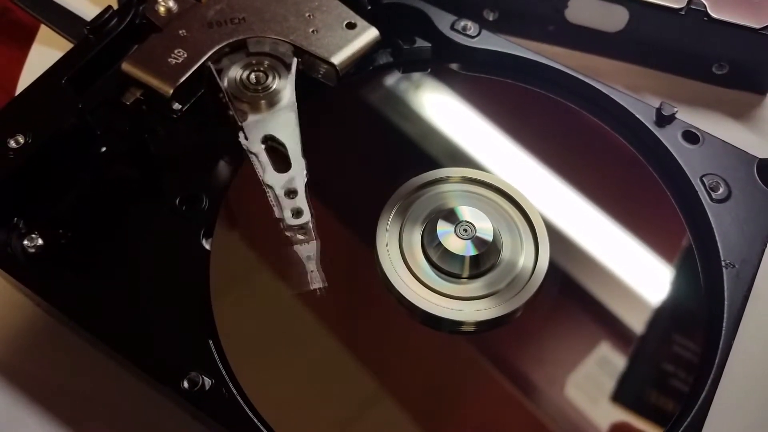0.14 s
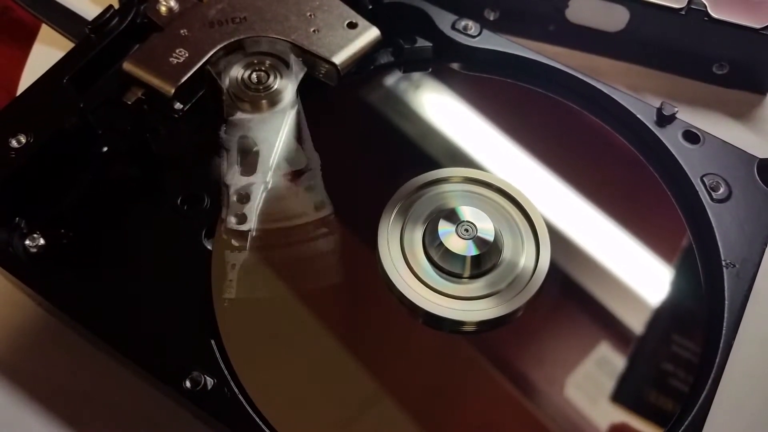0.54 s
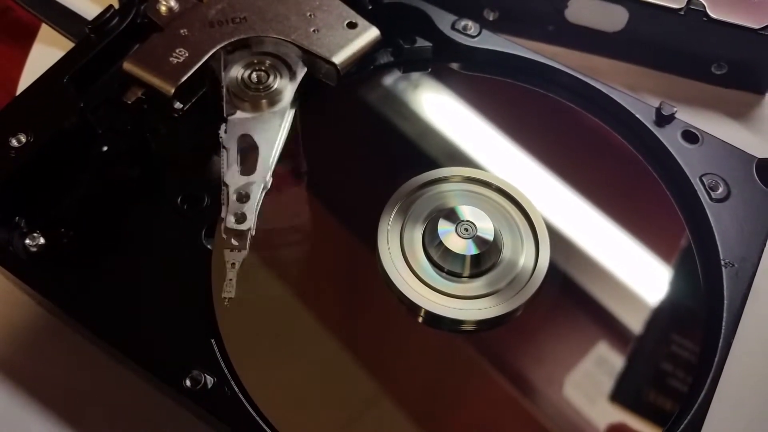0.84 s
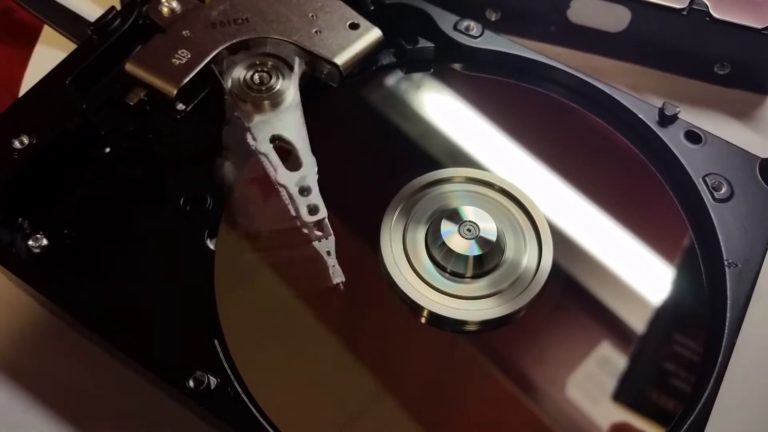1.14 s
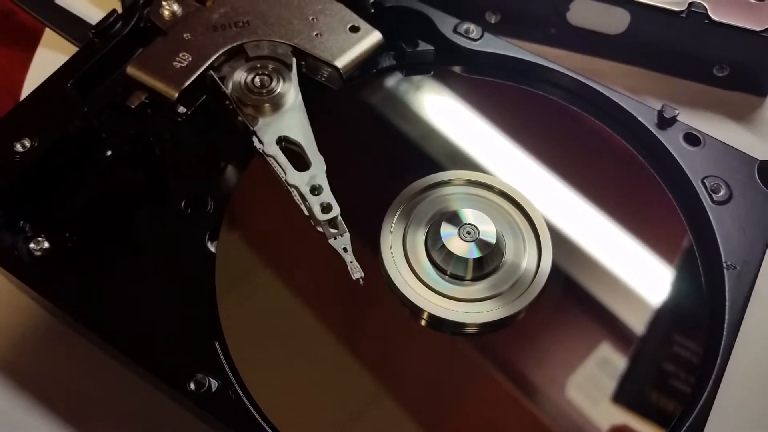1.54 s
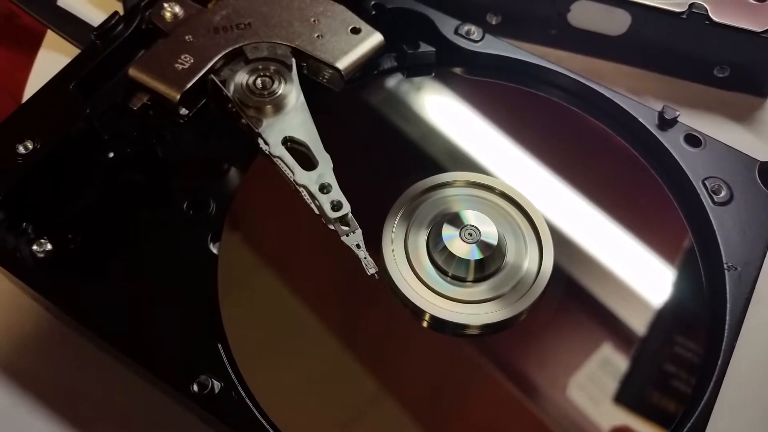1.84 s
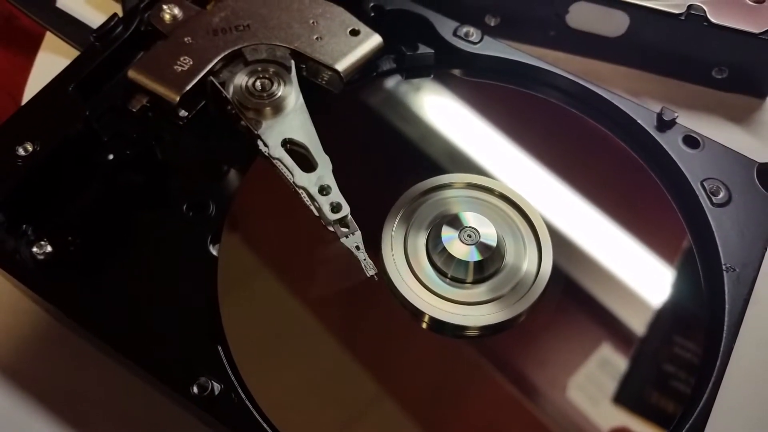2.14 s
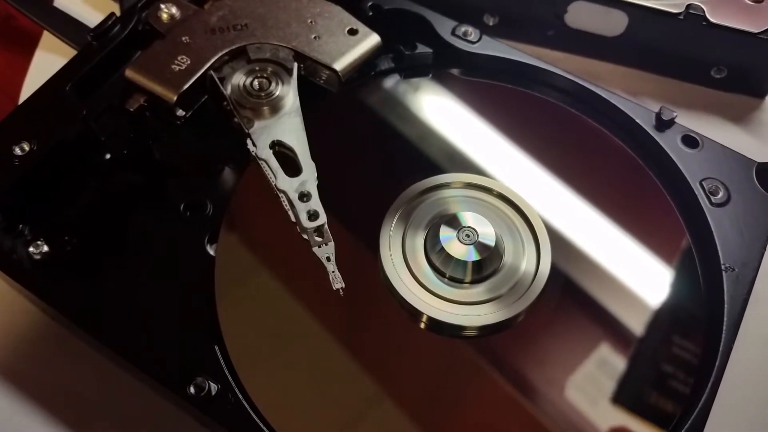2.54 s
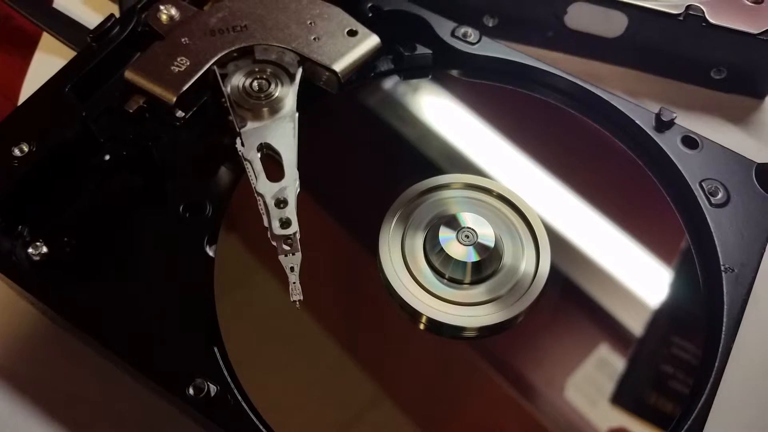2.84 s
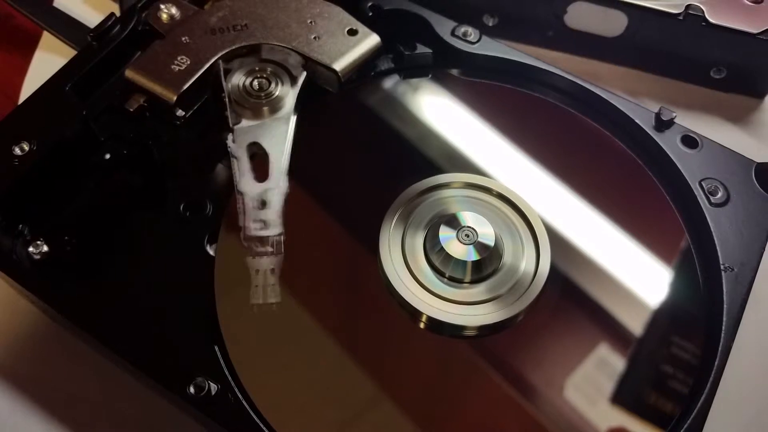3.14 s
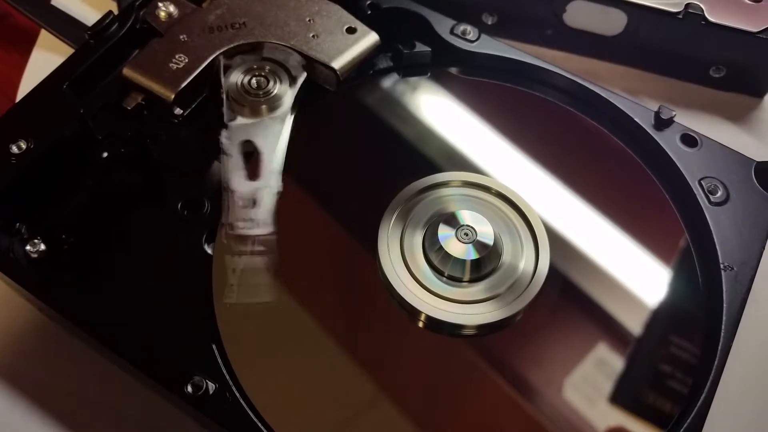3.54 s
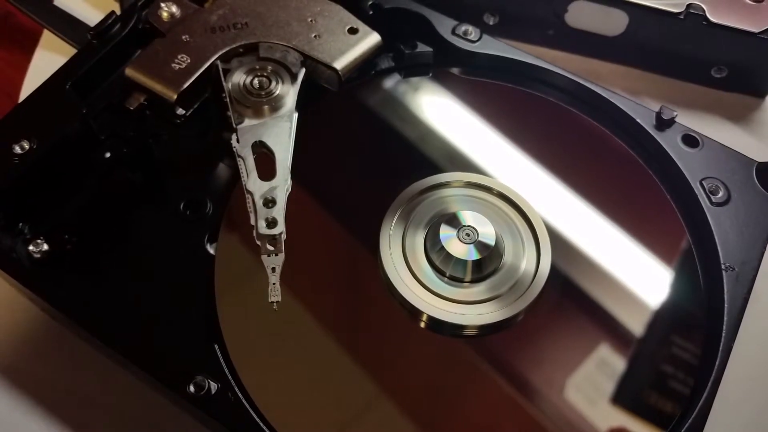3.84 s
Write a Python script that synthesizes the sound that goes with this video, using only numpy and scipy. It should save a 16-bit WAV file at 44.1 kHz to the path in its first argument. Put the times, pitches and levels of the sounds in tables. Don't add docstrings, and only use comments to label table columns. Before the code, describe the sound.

Hard disk arm ticks in rapid irregular bursts with short buzzes, above soft platter hum and hiss.

```python
import sys
import numpy as np
from scipy import signal
from scipy.fft import rfft, irfft, next_fast_len
from scipy.io import wavfile
from scipy.ndimage import uniform_filter1d, minimum_filter1d

SR = 44100
rng = np.random.default_rng(int(sys.argv[2]) if len(sys.argv) > 2 else 0)


def inscribe(sig):
    pcm = np.round(np.clip(np.atleast_2d(sig).T, -1, 1) * 32767)
    wavfile.write(sys.argv[1], SR, pcm.astype(np.int16))


def field_ratio(decibels):
    return 10 ** (np.asarray(decibels, dtype=float) / 20)


N = 176400

# f/Hz, rms level/dB
HUM = [(120, -45.5), (240, -57)]
# f/Hz, level/dB per Hz
AIR_SPECTRUM = [(12, -50), (20, -15.5), (121, -10), (189, -16.5), (235, -15.5), (1170, -27), (1780, -17),
                (2480, -25), (15000, -29.5)]
# f/Hz, likeness/1
LIKENESS = [(30, 0.87), (300, 0.45), (1000, 0.43), (9000, 0.2)]
# f/Hz, width/Hz, rms level/dB
WHISTLES = [(1773, 287, -39.5), (3210, 240, -48), (3790, 340, -48.5), (4796, 370, -46), (7300, 2050, -44.5)]
# t/s, peak level/dB, rattle length/ms, shake of base against arm/dB
EARLY_SEEKS = [(0.0004, -4, 1.5, -14.5), (0.0217, -18.5, 1.5, -8), (0.0326, -7.5, 1.8, -13.5),
               (0.0692, -13, 1.5, -12.5), (0.0808, -5.5, 1.6, -17.5), (0.0887, -6.5, 1.67, -16.5),
               (0.126, -16, 1.42, -15), (0.134, -7.5, 1.5, -21), (0.155, -13, 1.1, -17),
               (0.226, -19, 1.5, -21), (0.246, -10.5, 1.5, -19.5), (0.2607, -16, 1.5, -18),
               (0.2741, -10, 1.7, -11.5), (0.334, -12, 1.5, -13.5), (0.3451, -4, 1.2, -11.5),
               (0.415, -9, 1.8, -17), (0.4263, -8, 1.3, -12.5), (0.4332, -7, 1.64, -13.5),
               (0.4708, -9, 1.5, -13), (0.4828, -6, 1.1, -11), (0.506, -15.5, 1.8, -15),
               (0.52, -7.5, 1.3, -18), (0.5569, -8, 1.5, -16), (0.5793, -14.5, 1.3, -14),
               (0.595, -4, 3, -16.5), (0.6085, -4, 2.1, -19), (0.631, -11.5, 1.73, -15),
               (0.6481, -8.5, 1.5, -12.5), (0.7566, -15, 1.5, -11), (0.7635, -8, 1.5, -9.5),
               (0.799, -9, 1.3, -11), (0.8126, -12.5, 1.5, -9.5), (0.825, -7, 1.9, -16)]
MIDDLE_SEEKS = [(0.8554, -14, 1.5, -13), (0.8673, -5.5, 1.5, -13), (0.8943, -5.5, 1.3, -16),
                (0.902, -7, 1.5, -18.5), (0.9422, -5.5, 1.2, -17.5), (0.982, -18, 1.5, -13),
                (0.9879, -12, 1.5, -11.5), (1, -10, 1.27, -14), (1.0101, -7.5, 1.5, -12),
                (1.0137, -8, 1.3, -18), (1.0443, -6.5, 1.1, -16), (1.0614, -19, 1.5, -12),
                (1.068, -11, 1.1, -11), (1.1194, -10.5, 1.3, -19), (1.1529, -13, 1.7, -16),
                (1.2054, -13, 1.58, -17), (1.2297, -10.5, 1.24, -17), (1.415, -14, 1.4, -16),
                (1.488, -11.5, 1.8, -16), (1.5004, -5.5, 1.7, -16), (1.5769, -11, 1.2, -8),
                (1.8663, -5, 2.3, -26), (1.8724, -13.5, 2.05, -24), (2.2634, -7.5, 1.82, -13.5),
                (2.3289, -7.5, 1.2, -16), (2.3496, -6, 0.94, -12), (2.3896, -9, 1, -15.5),
                (2.4458, -17.5, 1.4, -9), (2.4594, -8, 1.6, -12.5), (2.5127, -16.5, 1.2, -10),
                (2.525, -6, 1.3, -14)]
LATE_SEEKS = [(2.7717, -16, 1.5, -6.5), (2.7861, -6, 1.8, -13), (2.843, -10.5, 2, -15),
              (2.8531, -4, 1.1, -18.5), (3.2542, -10, 1.5, -16), (3.2591, -8.5, 1.5, -20),
              (3.269, -3.5, 1.69, -18), (3.304, -8.5, 1.4, -12.5), (3.3219, -12.5, 1.6, -14),
              (3.3299, -10.5, 1.5, -13), (3.364, -19, 1.5, -18), (3.386, -21, 1.3, -15),
              (3.3943, -6, 1.32, -14.5), (3.5227, -11, 1.5, -15), (3.5291, -13, 1.5, -10.5),
              (3.551, -11.5, 1.5, -13), (3.5607, -8, 1.4, -16), (3.5986, -10.5, 1.7, -8.5),
              (3.6316, -8.5, 1.4, -14), (3.6483, -13.5, 1.5, -11), (3.6531, -6.5, 1, -17),
              (3.674, -14.5, 1.5, -12)]
# t/s, peak level/dB, rattle length/ms, shake of base against arm/dB
FURTHER_SEEKS = [(0.177, -9.5, 3.6, -14), (0.662, -18, 2.5, -13), (0.7026, -16, 3.16, -10),
                 (1.1754, -16.5, 2.8, -12), (1.2432, -8.5, 3.1, -13.5), (1.4268, -13, 3.8, -9),
                 (2.3206, -21, 1.5, -13), (2.3395, -17, 2.2, -14), (2.3845, -20, 2.5, -15), (2.278, -20, 2.5, -9),
                 (3.2224, -17.5, 2.44, -14), (3.231, -7.5, 1.7, -14), (3.2348, -7.5, 2.2, -17),
                 (3.2666, -9, 1.5, -17), (3.4063, -14, 3.4, -10.5), (3.590, -21, 2.3, -11.5)]
# t/s, length/s, level/dB
BUZZES = [
    (0.184, 0.031, -7.5),
    (0.348, 0.04135, -8),
    (.669, 0.0146, -7),
    (0.712, 0.02, -7.5),
    (1.248, 0.14, -8),
    (1.434, 0.021, -7.5),
    (1.590, 0.2284, -7.5),
    (3.412, 0.077, -9),
]
# f/Hz, level/dB, t60/s, left over right/dB, right lag/ms
ARM_MODES = [(2905, -13, 0.043, 1.5, 0.23), (3110, -4, 0.016, -0.5, 0.8), (3415, -3, 0.018, 1, 0.9),
             (3477, -2.5, 0.03, 3, 0.52), (3690, -4.5, 0.016, 2, 0.2), (3800, -3, 0.014, -6, 1.07),
             (3892, -11.5, 0.036, -1, 0.77), (4410, -12.5, .005, 4, 1.3), (4790, -10.5, 0.012, 8.5, 2.3),
             (5217, -5, 0.014, 7, -0.15), (6446, -2.5, 0.022, 8, 0.89), (6593, -2, 0.012, 8.5, 0.8),
             (6775, -5.5, 0.01, 14, 0.4), (7350, -14, 0.019, 9, 1.1)]
# f/Hz, level/dB, t60/s, left over right/dB, right lag/ms
PLATE_MODES = [(8400, -16, 0.0035, 6, 0.1996), (9340, -30, 0.008, 10, 0.078),
               (10023, -19.5, 0.017, -4, 0.17), (11670, -19, 0.012, 4, .15), (12900, -15, 0.008, 14, .2),
               (13480, -14, 0.011, 6.5, 0.2126), (14210, -21.5, 0.01, 7, 0.174)]
# f/Hz, level/dB, t60/s, left over right/dB, right lag/ms, change in a buzz/dB
BASE_MODES = [(976, -21, 0.076, 10, 0.097, -10.5), (1486, -6.5, 0.045, 7.5, 0.064, -14.5),
              (1762, -13, 0.0335, -2, 0.058, -22), (1916, -9.5, 0.045, 2, 0.13, -3.5),
              (2460, -12, 0.021, 4, 0.083, -10), (1262, -16.5, 0.0081, 4.5, 0.088, -11)]
# f/Hz, level/dB, t60/s
DESK_MODES = [(240, -33, 0.12), (298.1, -22, 0.17), (191, -27.5, 0.058)]
# t/s, peak level/dB
PINGS = [
    (1.1258, -20.5),
    (1.1806, -18.5),
    (1.2057, -18),
    (2.4748, -17.5),
]

LAG_MS = 0.18
ATTACK_S, BUZZ_ATTACK_S, RELEASE_S = 0.000328, 0.0023, 0.0029
SEEK_DB, BASE_DB, BUZZ_HZ = -1, 11, 380.6
DESK_TOP_HZ = 447


def rms_one(x):
    return x / np.sqrt(np.mean(x ** 2) + 1e-20)


def at_hz(points, hz):
    table_hz, value = np.transpose(points)
    return np.interp(np.log(hz), np.log(table_hz), value)


def butter(x, order, hz, kind):
    return signal.sosfilt(signal.butter(order, hz, kind, fs=SR, output="sos"), x)


def drift(hz):
    r = np.exp(-80 * np.pi * hz / SR)
    noise = rng.standard_normal(N // 40 + 2002)
    slow = signal.lfilter([1], [1, -2 * r, r * r], noise)[2000:]
    return np.interp(np.arange(N) / 40, np.arange(len(slow)), rms_one(slow))


def ring(x, hz, t60):
    r = field_ratio(-60 / (t60 * SR))
    w = 2 * np.pi * hz / SR
    return signal.lfilter([0, np.sin(w)], [1, -2 * r * np.cos(w), r * r], x + 1e-18)


def place(x, pan_db, lag_ms):
    size = next_fast_len(N + 64)
    cycles = np.arange(size // 2 + 1) / size * SR * lag_ms / 1000
    late = irfft(rfft(x, size) * np.exp(-2j * np.pi * cycles), size)[:N]
    return np.array([field_ratio(pan_db / 2) * x, field_ratio(-pan_db / 2) * late])


def spindle():
    t = np.arange(N) / SR
    hum = 0
    for hz, db in HUM:
        level_db = db + 4 + 2.5 * drift(3.69)
        hum = hum + field_ratio(level_db) * np.sin(2 * np.pi * hz * t)
    return hum


def air():
    out = 0
    edges = 20 * 2 ** np.arange(0, 9.6, 0.5)
    white = rng.standard_normal((2, 2, N))
    for k, (low, high) in enumerate(zip(edges, edges[1:])):
        mid, side = butter(white[k % 2], 2, [low, high], "band")
        center = np.sqrt(low * high)
        alike = np.clip(at_hz(LIKENESS, center), 0, 1)
        gain = field_ratio(at_hz(AIR_SPECTRUM, center) + 2 * drift(8.4))
        out = out + gain * (np.sqrt(1 + alike) * mid + np.sqrt(1 - alike) * side * [[1], [-1]])
    return field_ratio(-38.5) * rms_one(out)


def whistle():
    throb = 1 + 0.24 * np.sin(2 * np.pi * HUM[0][0] * np.arange(N) / SR)
    white = rng.standard_normal((3, N)) * throb
    tones = 0
    for hz, width, db in WHISTLES:
        tones = tones + field_ratio(db) * rms_one(butter(white, 2, [hz - width / 2, hz + width / 2], "band"))
    alike = 0.51
    return np.sqrt(alike) * place(tones[0], 10.5, LAG_MS) + np.sqrt(1 - alike) * tones[1:]


def body(force, modes, move_db, buzzing, now):
    out = 0
    for k, (hz, level_db, t60, pan_db, lag_ms, *buzz_db) in enumerate(modes):
        spread_db = 1.4 * rng.standard_normal(len(buzzing)) * (1 - buzzing / 2)
        strike = field_ratio((spread_db + move_db + buzzing * sum(buzz_db))[now])
        sound = ring(force * strike, hz, t60) * field_ratio(level_db - 26.5) * (-1) ** k
        out = out + place(sound, pan_db, lag_ms)
    return out


def arm():
    t = np.arange(N) / SR
    seeks = EARLY_SEEKS + MIDDLE_SEEKS + LATE_SEEKS + FURTHER_SEEKS
    moves = [(s, db + SEEK_DB, ms / 1000, base, 0) for s, db, ms, base in seeks]
    moves += [(s, db, length, -BASE_DB, 1) for s, length, db in BUZZES]
    start, db, length, base_db, buzzing = np.transpose(sorted(moves))
    now = np.maximum(np.searchsorted(start, t, "right") - 1, 0)
    age, buzz = t - start[now], buzzing[now]

    rise = np.clip(age / np.where(buzz, BUZZ_ATTACK_S, ATTACK_S), 0, 1)
    fall = np.exp(-np.maximum(age - length[now], 0) / RELEASE_S)
    shape = rise * fall * field_ratio(db[now])
    cycle = 2 * np.pi * BUZZ_HZ * t
    grain_db = 4 * np.minimum(rng.exponential(1, N), 2.825)
    grain = rms_one(rng.standard_normal(N) * field_ratio(grain_db))
    rattle = grain * (1 + 0.24 * buzz * np.cos(2 * cycle)) * shape
    kick = np.zeros(N)
    kick[((start + 0.0007) * SR).astype(int)] = field_ratio(db) * (1 - buzzing)
    force = rattle + field_ratio(15) * kick

    metal = body(force, ARM_MODES, 0, buzzing, now) + body(force, PLATE_MODES, 0, buzzing, now)
    metal += body(force, BASE_MODES, base_db + BASE_DB, buzzing, now)
    crack = butter(rng.standard_normal((2, N)) * shape, 2, [2230, 10200], "band")
    needle = butter(kick, 2, 2500, "high")
    metal += field_ratio(-13) * crack + place(field_ratio(-2.5) * needle, 5, LAG_MS)
    metal = butter(metal, 6, 947, "high")

    desk_modes = [(*row, 0, 0, -13) for row in DESK_MODES]  # centred, 13 dB weaker in a buzz
    desk = butter(body(force, desk_modes, 0, buzzing, now), 4, DESK_TOP_HZ, "low")
    sounding = uniform_filter1d(buzz * (age < length[now]), size=600)
    tone = sounding * (field_ratio(-40.5) * np.sin(cycle) + field_ratio(-45) * np.sin(3 * cycle))
    return metal + desk + tone


def pings():
    hz = 1927.4
    clicks = np.zeros(N)
    for s, db in PINGS:
        clicks[int(s * SR)] = field_ratio(db + 8)
    soft = butter(ring(clicks, hz, 0.084), 2, [hz * 0.64, hz * 2.2], "band")
    return place(soft, 0.5, 0.11)


def scene():
    hiss = signal.sosfilt(signal.cheby2(8, 40, 14800, fs=SR, output="sos"), air() + whistle())
    return spindle() + hiss + arm() + pings()


def top_cut(x):
    return signal.sosfilt(signal.butter(12, 16800, fs=SR, output="sos"), x)


def record(dry):
    top = 1.03
    dry = top * np.tanh(dry / top)
    power = uniform_filter1d(np.mean(dry ** 2, axis=0), size=441)
    loud = minimum_filter1d(power, int(0.023 * SR)) > field_ratio(2 * -22.5)
    late = np.roll(loud, int(0.01 * SR)) * 1.0
    starved = uniform_filter1d(uniform_filter1d(late, size=500), size=500)
    hz = np.arange(N // 2 + 1) * SR / N
    weak = (hz > DESK_TOP_HZ) & (hz < 940) | (hz > 14640)
    kept = dry - 0.985 * irfft(rfft(dry) * weak, N) * starved
    mix = signal.sosfilt(signal.cheby2(7, 45, 16600, fs=SR, output="sos"), kept)
    return top_cut(mix)


dry = scene()
out = record(dry)
inscribe(out)
```